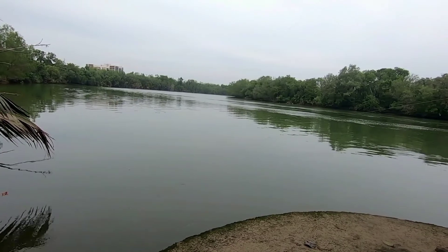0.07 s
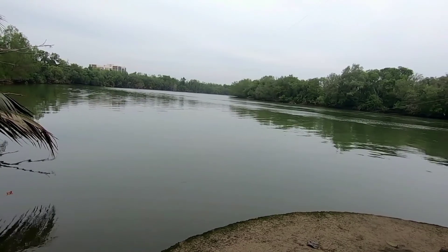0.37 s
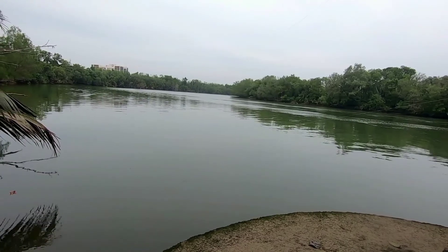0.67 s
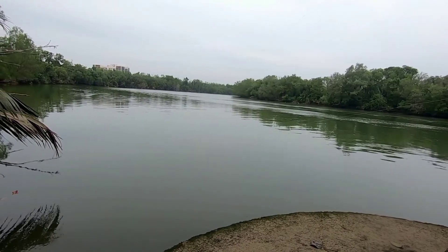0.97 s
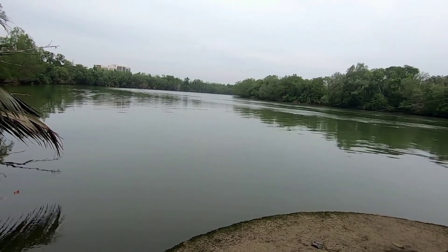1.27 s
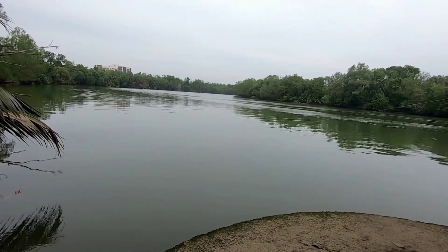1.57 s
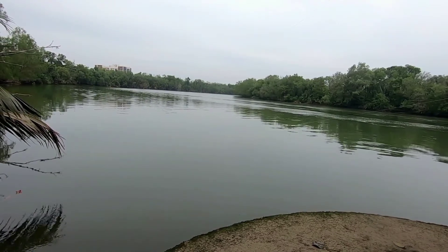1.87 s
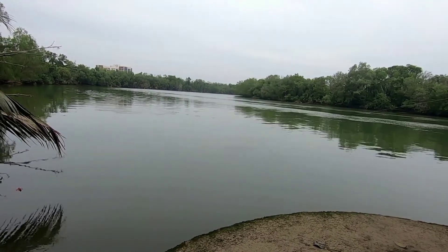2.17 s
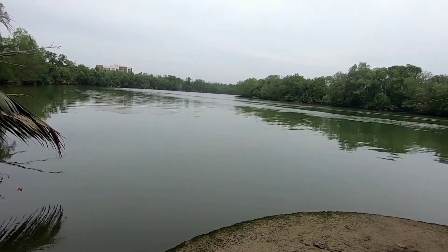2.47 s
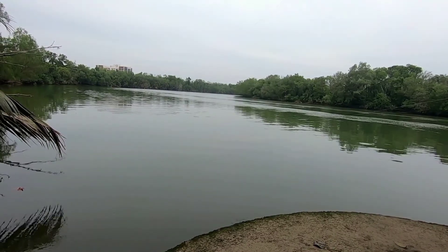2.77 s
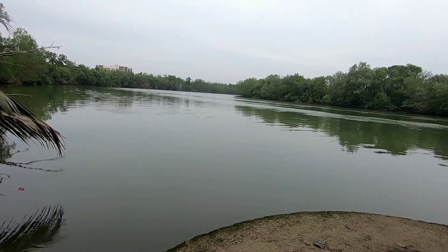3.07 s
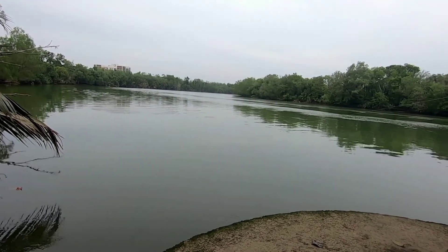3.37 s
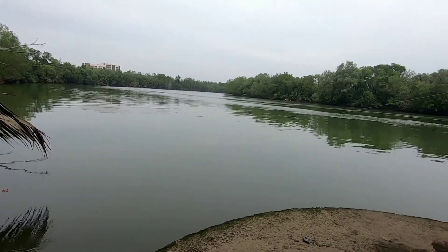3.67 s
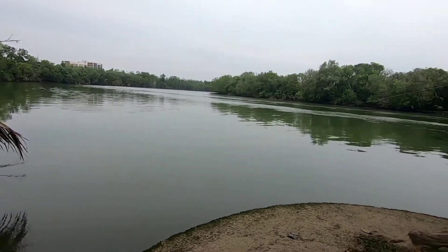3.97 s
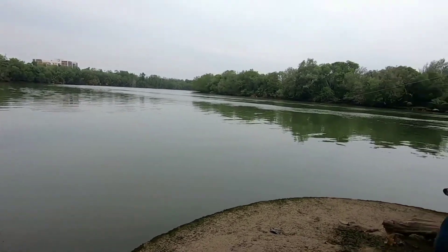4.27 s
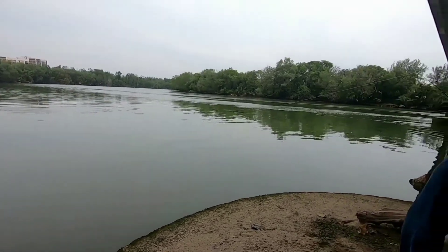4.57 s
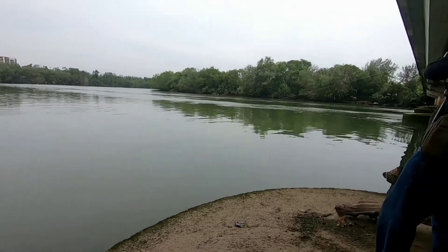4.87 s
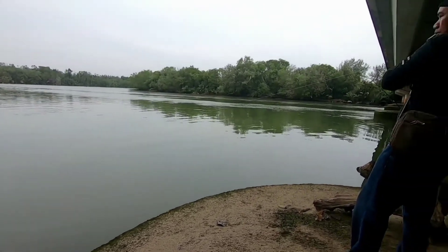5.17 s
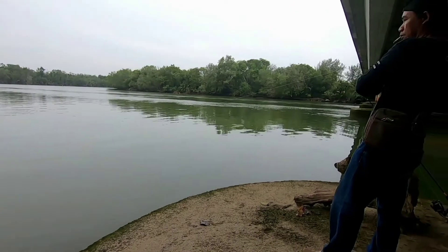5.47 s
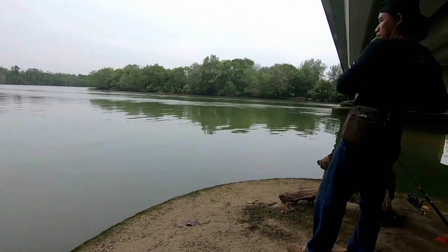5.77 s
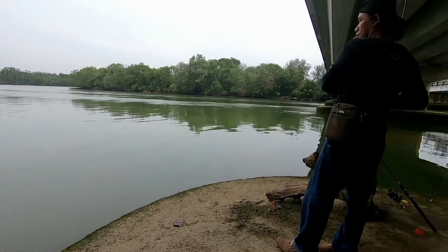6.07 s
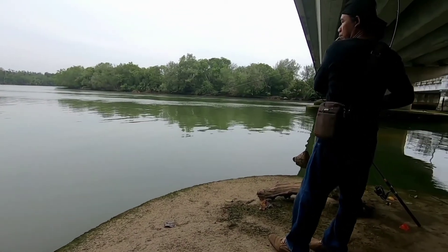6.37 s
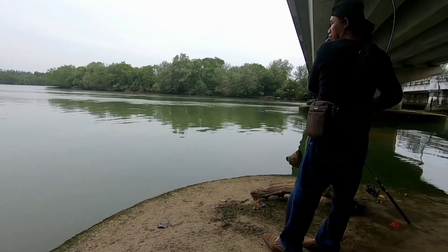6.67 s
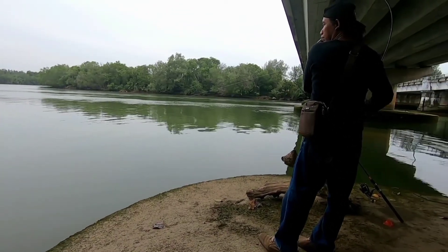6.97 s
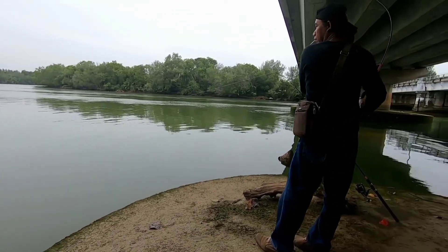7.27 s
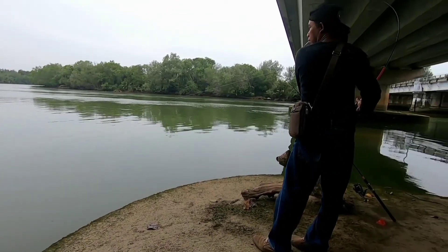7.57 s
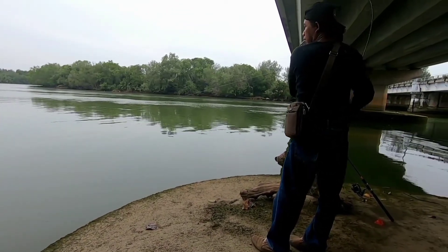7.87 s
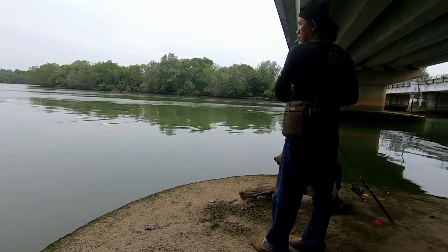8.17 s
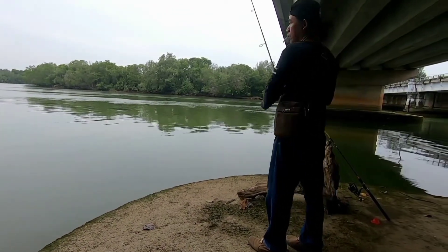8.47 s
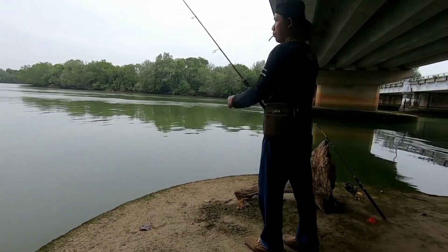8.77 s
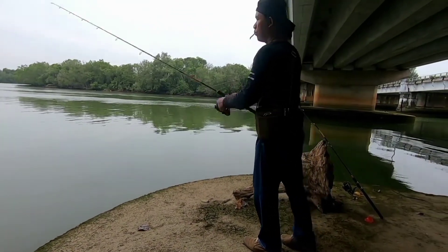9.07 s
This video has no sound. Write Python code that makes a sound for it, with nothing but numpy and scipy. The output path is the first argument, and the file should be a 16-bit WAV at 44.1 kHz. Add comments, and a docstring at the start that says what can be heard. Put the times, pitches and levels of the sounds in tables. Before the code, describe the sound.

Cicadas buzz steadily by a river under a road bridge, over rumbling traffic, humming engines, light wind and a few microphone bumps.

```python
"""A river bank under a road bridge. From the start cicadas buckle their tymbals in the trees, traffic rushes
overhead, wind buffets the microphone and two engines pass, one after the other. From about 2 s come small
plops, ticks and rustles; near 3 s fingers begin to bump and rub the camera, and a bird gives a falling
whistle, faintly again near 6 s. Then a farther engine draws near, and at the very end one insect starts
up on a clear pitch."""
import sys
import numpy as np
from scipy import signal
from scipy.fft import rfft, irfft
from scipy.io import wavfile
from scipy.ndimage import uniform_filter1d

SR = 44100
rng = np.random.default_rng(int(sys.argv[2]) if len(sys.argv) > 2 else 0)


def digitize_waveform(pressure):
    """Quantize a signal to 16-bit integers and store it at the path in sys.argv[1].

    Rows of a 2-D input are taken as channels; values are limited to [-1, 1].
    """
    field = np.atleast_2d(pressure).T
    bounded = np.clip(field, -1, 1)
    quanta = np.round(bounded * 32767).astype(np.int16)
    wavfile.write(sys.argv[1], SR, quanta)


N = 407043
T = np.arange(N) / SR


def from_db(db):
    """Amplitude grows tenfold for every 20 dB."""
    return 10 ** (np.asarray(db) / 20)


def rms_one(x):
    """Normalisation to unit power."""
    return x / np.sqrt(np.mean(np.abs(x) ** 2) + 1e-20)


def in_time(rows):
    """Linear interpolation of each column of a curve at every sample."""
    times, *columns = np.transpose(rows)
    return [np.interp(T, times, column) for column in columns]


def at_hz(points, hz, axis=1):
    """Interpolation of a spectrum on a log-frequency axis."""
    points = np.array(points, float)
    return np.interp(np.log(hz + 1e-3), np.log(points[:, 0]), points[:, axis])


def drift(rate_hz):
    """Low-pass filtered noise: a slow random fluctuation of unit rms."""
    pole = np.exp(-80 * np.pi * rate_hz / SR)
    slow = signal.lfilter([1], [1, -2 * pole, pole * pole], rng.standard_normal(N // 40 + 2002))[2000:]
    return np.interp(np.arange(N) / 40, np.arange(len(slow)), rms_one(slow))


def fade(start, end, ramp_s):
    """A trapezoidal envelope, its ramps centred on start and end."""
    return np.clip((T - start) / ramp_s + .5, 0, 1) * np.clip((end - T) / ramp_s + .5, 0, 1)


def swells(rows):
    """Incoherent sounds add in power: the summed power of Gaussian swells."""
    return sum(from_db(db) ** 2 * np.exp(-(2 * (T - crest) / length) ** 2) for crest, length, db in rows)


def trees(x, t60, direct):
    """Scattering by leaves and trunks adds a dense decaying tail, different at each ear."""
    tails = rng.standard_normal((2, SR)) * from_db(-60 * T[:SR] / t60)
    tails /= np.sqrt(np.sum(tails ** 2, axis=1, keepdims=True))
    scattered = signal.fftconvolve(x[None], tails, axes=1)[:, :N]
    return np.sqrt(direct) * x + np.sqrt(1 - direct) * scattered


# Width of the noise field. Each row: frequency in Hz, side minus mid in dB, left minus right in dB.
STEREO_FIELD = [(30, -28, -2), (80, -18, -0.5), (140, -9, 0), (214, -3.5, -2.5), (308, -1.5, 6),
                (573, -4, 1), (950, 2, -4), (1330, -1, -5.5), (2400, -2, -1.5), (4000, -4.5, -2),
                (6000, -3, 1), (12000, 3.5, -0.5)]
def air_noise(spectrum, flutter_db=None):
    """Coloured noise, partly coherent between the ears; its mid has unit rms before any flutter."""
    hz = np.arange(N // 2 + 1) * SR / N
    low_hz, high_hz = spectrum[0][0] / 1.2, spectrum[-1][0] * 1.2
    band = 1 / (1 + (hz / high_hz) ** 12) / (1 + (low_hz / (hz + 1)) ** 12)
    mid, side = rfft(rng.standard_normal((2, N)))
    width, sides = from_db(at_hz(STEREO_FIELD, hz)), np.array([[1], [-1]])
    pair = (mid + sides * width * side) * from_db(sides * at_hz(STEREO_FIELD, hz, axis=2) / 2)
    x = irfft(pair * band * from_db(at_hz(spectrum, hz)), N)
    x /= np.std(x.mean(0))
    return x if flutter_db is None else x * from_db(flutter_db * drift(22))


def self_noise(level_db=-86.5):
    """The noise floor of the microphone is a faint steady hiss."""
    return from_db(level_db) * air_noise([(7000, -.5), (10500, -3.5), (12000, 2.5), (15000, -3.5)])


# Wind spectrum. Each row: frequency in Hz, relative density in dB.
WIND_SPECTRUM = [(16, -15), (26, -14), (37, -3.5), (46, 1.5), (58, -6.5), (72, -7)]
# Breeze between the gusts. Each row: time in seconds, level in dB.
BREEZE = [(0, -20.5), (1.7, -28), (5.9, -25.5), (6.6, -34), (9.23, -34.5)]
# Each row: crest time in seconds, length in seconds, level in dB.
GUSTS = [(0.124, 0.12, -26), (2.4, 0.21, -20), (2.7, 0.15, -21.5), (3.11, 0.26, -20.5), (4.3, 0.16, -16.5),
         (4.58, 0.11, -16), (5.63, 0.16, -19.5), (5.8, 0.076, -14.5), (6.97, 0.065, -27), (8.11, 0.18, -20),
         (8.38, 0.33, -25.5)]
def wind():
    """Turbulent pressure of breeze and gusts buffets both microphone ports nearly alike."""
    power = from_db(in_time(BREEZE)[0]) ** 2 + swells(GUSTS)
    return np.sqrt(power) * air_noise(WIND_SPECTRUM, flutter_db=1.5)


# Each row: start in seconds, push level in dB, push frequency in Hz, shake level in dB.
BUMPS = [(2.979, -34, 136, -14), (3.055, -24, 131, -16), (3.149, -24, 130, -18), (3.174, -7.5, 126, -8),
         (4.67, -16, 80, -38), (5.262, -11.5, 68, -32), (8.083, -24.5, 124, -23), (8.3031, -7.5, 126, -8.5)]
# Each row: frequency in Hz, gain in dB, time to fall 60 dB in seconds, share in phase at both ports.
HOUSING_MODES = [(131, -0.5, 0.13, 0.2), (188.5, 4, 0.09, 0.22), (270, 2.5, 0.047, 0.07),
                 (485, -1.5, 0.023, 0.15), (637, -1.5, 0.025, 0.02)]
def bumps(cycles=.96, lag_s=.0023):
    """An impact pushes both ports alike and excites the housing's modes; returns (in phase, opposed)."""
    push, shake = np.zeros((2, N))
    t = T[:SR // 4]
    late = np.maximum(t - lag_s, 0)
    for start, push_db, hz, shake_db in BUMPS:
        span = slice(int(start * SR), int(start * SR) + len(t))
        envelope = from_db(push_db) * np.exp(-(late * hz / cycles) ** 4)
        push[span] += envelope * np.sin(2 * np.pi * hz * late)
        for k, (mode_hz, db, t60, in_phase) in enumerate(HOUSING_MODES):
            ring = (-1) ** k * from_db(shake_db + db - 60 * t / t60) * np.sin(2 * np.pi * mode_hz * t)
            shake[span] += ring
            push[span] += in_phase * ring
    fingertip = signal.butter(4, 900, fs=SR, output="sos")   # a soft contact excites nothing high
    return signal.sosfilt(fingertip, np.array([push, shake]) + 1e-18)


# Fingers shifting on the camera. Each row: start in seconds, end in seconds, level in dB.
RUBS = [(2.956, 3.43, -36), (3.697, 4.46, -32.5), (4.45, 5.25, -43), (5.248, 5.803, -42),
        (5.84, 6.505, -45)]
# Each row: frequency in Hz, relative density in dB.
RUB_SPECTRUM = [(50, -6), (200, 0.5), (340, -4.5), (420, -11.5), (600, -1.5), (740, -8), (930, -17),
                (1100, -19), (1400, -29.5), (2200, -37.5)]
def handling():
    """Structure-borne sound: shaking and friction move the two ports in opposition, a push in phase."""
    push, shake = bumps()
    pressure = sum(from_db(db) * fade(start, end, ramp_s=.1) for start, end, db in RUBS)
    rub = pressure * rms_one(air_noise(RUB_SPECTRUM, flutter_db=5.5)[0])
    return push + (shake + rub) * [[-1], [1]]


# Each row: crest time in seconds, length in seconds, level in dB.
RUSTLES = [(2.17, 0.071, -47), (4.27, 0.11, -52), (4.44, 0.11, -56), (4.61, 0.092, -53), (8.16, 0.2, -50.5)]
# Each row: frequency in Hz, relative density in dB.
RUSTLE_SPECTRUM = [(800, -4.5), (1400, 5), (2000, -5), (3000, -3.5), (4500, -11), (7000, -15.5)]
def rustle():
    """Friction of cloth or grit close by: fast amplitude modulation clumps noise into grains."""
    grains = rms_one(air_noise(RUSTLE_SPECTRUM) * from_db(3.5 * drift(110)))
    return np.sqrt(swells(RUSTLES)) * grains


# Each row: start in seconds, source peak in dB, centre in Hz, width in octaves, decay in seconds.
TICKS = [(1.3443, -23, 4800, 1.2, 0.001), (2.154, -38, 2500, 1.2, 0.0017), (2.3186, -34, 2400, 1.5, .012),
         (2.3345, -29.5, 2300, 1.6, 0.0035), (2.445, -38, 2540, 0.8, 0.0026),
         (4.1208, -42, 3200, 0.6, .002), (4.153, -38, 2800, 1.3, 0.0014), (4.2328, -37, 2600, 1.3, 0.0015),
         (4.2404, -36, 2600, 1.3, .0012), (4.2495, -37, 2500, 1.5, .005), (4.255, -40, 1000, 0.64, 0.029),
         (4.294, -38, 3100, 1.2, 0.0013), (4.4278, -37, 2700, 1.0, .0015), (4.432, -39, 2450, 0.5, 0.016),
         (4.466, -37, 1290, 0.29, 0.022), (5.3064, -40, 2750, .45, .001),
         (5.3148, -30.5, 2700, 0.55, 0.0006), (7.601, -47, 4300, 0.89, 0.059),
         (7.879, -39, 1280, 0.3, 0.13), (8.112, -33, 2200, 1.3, 0.0025), (8.223, -37, 2200, 1.4, 0.0054),
         (8.835, -32, 1730, 0.24, 0.0029)]
def ticks(grain_db=4, crack=4, right_lead_db=3.5):
    """Tiny snaps are band-limited transients: an impulsive crack, then decaying, crumbling grains."""
    out, t = np.zeros(N), T[:SR // 4]
    for start, db, hz, octaves, decay_s in TICKS:
        edges_hz = hz * 2 ** (np.array([-.5, .5]) * octaves)
        grains = rng.standard_normal(len(t)) * from_db(grain_db * drift(280)[:len(t)])
        burst = grains * np.exp(-t / decay_s) * (1 - np.exp(-2 * t / decay_s))
        burst[0] += crack
        snap = signal.sosfilt(signal.butter(3, edges_hz, "band", fs=SR, output="sos"), burst)
        onset = int(start * SR)
        out[onset:onset + len(t)] += from_db(db) * snap / np.abs(snap).max()
    soft = signal.sosfilt(signal.butter(4, 7500, fs=SR, output="sos"), out + 1e-18)
    return trees(soft, t60=.09, direct=.85) * from_db(np.array([[-.5], [.5]]) * right_lead_db)


# Plops, likely at the water's edge. Each row: start in seconds, source level in dB, first pitch in Hz.
PLOPS = [(2.075, -22, 714), (3.017, -26, 1000), (3.051, -25.5, 1020)]
def plops(t60=.047, attack_s=.00083, chirp=.76):
    """A bubble is a damped resonator that rings briefly and rises in pitch."""
    out = np.zeros(N)
    for start, db, hz in PLOPS:
        t = np.maximum(T - start, 0)
        envelope = from_db(db - 60 * np.minimum(t / t60, 3)) * (1 - np.exp(-t / attack_s))
        out += envelope * np.sin(2 * np.pi * hz * t * (1 + chirp * t))
    return trees(out, t60=.25, direct=.6)


# Each row: start and length in seconds, first and last pitch in Hz, level in dB, direct share of power.
WHISTLES = [(2.791, 0.048, 4000, 3200, -51.5, 0.2), (3.365, 0.195, 4650, 3225, -34.5, 0.1),
            (5.762, .024, 4450, 4270, -59, .2), (5.803, .036, 4300, 3300, -55, .1)]
def bird(glide_s=.0082, settle_s=.045, quaver=.012, flutter_db=2, fade_db_per_s=36):
    """Frequency modulation: a whistle drops fast, settles with a quaver and lingers among the trees."""
    out = np.zeros((2, N))
    for start, length, first_hz, last_hz, db, direct in WHISTLES:
        t = np.maximum(T - start, 0)
        glide = .7 * np.exp(-t / glide_s) + .3 * np.exp(-t / settle_s)
        hz = last_hz + (first_hz - last_hz) * glide
        phase = 2 * np.pi * np.cumsum(hz * (1 + quaver * drift(120))) / SR
        level = from_db(db - fade_db_per_s * t + flutter_db * drift(36))
        whistle = level * fade(start + .001, start + length, .008) * np.sin(phase)
        out += trees(whistle, t60=1.1, direct=direct)
    return out


# Each row: crest time in seconds, length in seconds, centre in Hz, level in dB.
TYRE_DRONES = [(3.877, 0.28, 299, -46), (5.432, .32, 205, -37.5)]
def tyre_drones(half_width_octaves=.26, skirt_db=-18):
    """Narrow-band noise has a pitch: tyres drone briefly on the deck."""
    spread, out = 2 ** half_width_octaves, np.zeros((2, N))
    for crest, length, hz, db in TYRE_DRONES:
        band = air_noise([(hz / spread, skirt_db), (hz, 0), (hz * spread, skirt_db)])
        out += np.sqrt(swells([(crest, length, db)])) * band
    return out


# Each row: time in seconds, then the levels of road roar, tyre rush and hiss in dB.
TRAFFIC_LEVELS = [(0, -42, -40.5, -53.5), (1, -40, -43.5, -54), (2.1, -41, -41.5, -55),
                  (2.5, -41, -46.5, -56), (3.1, -43, -46, -59), (3.45, -47.5, -49, -61),
                  (4.35, -43.5, -48.5, -59.5), (5.1, -51, -49.5, -62.5), (5.55, -44.5, -49, -60.5),
                  (6.1, -51, -50.5, -61), (8.2, -49.5, -46.5, -60), (9.23, -51, -45.5, -57)]
# Heavy vehicles shake the deck. Each row: crest time in seconds, length in seconds, level in dB.
DECK_SURGES = [(2.35, 0.38, -32), (3.08, 0.4, -23), (5.4, 0.13, -26), (5.75, 0.68, -30), (6.4, 0.16, -36)]
# Spectra of the four noises. Each row: frequency in Hz, relative density in dB.
DECK_SPECTRUM = [(55, -19.5), (80, 5.5), (120, 3), (160, -4.5), (210, -10), (270, -22), (400, -34)]
ROAR_SPECTRUM = [(150, -3.5), (230, -1.5), (320, -0.5), (500, 3.5), (750, 1), (950, -4.5), (1300, -24)]
TYRE_SPECTRUM = [(600, -9.5), (850, 0), (1050, 1), (1400, -2.5), (1800, -7), (2300, -15), (3200, -33)]
HISS_SPECTRUM = [(1600, -13), (2300, 8.5), (3000, 6), (4000, 1.5), (5000, 0), (7000, -18.5), (9500, -43.5)]
def traffic(deck_db=-31.5, deck_follows=.69):
    """Forced vibration: the deck rumbles with the road roar, under tyre rush and a thin hiss."""
    roar_db, tyre_db, hiss_db = in_time(TRAFFIC_LEVELS)
    deck_level = from_db(deck_db + deck_follows * (roar_db - roar_db.mean()))
    deck = np.sqrt(deck_level ** 2 + swells(DECK_SURGES)) * air_noise(DECK_SPECTRUM, flutter_db=2)
    roar = from_db(roar_db) * air_noise(ROAR_SPECTRUM)
    tyres = from_db(tyre_db) * air_noise(TYRE_SPECTRUM, flutter_db=1.23)
    return deck + roar + tyres + from_db(hiss_db) * air_noise(HISS_SPECTRUM)


# Each row: time in seconds, level in dB.
FAR_ENGINE_LEVELS = [(5.8, -32), (8.6, -32.5), (9.2, -23)]
def far_engine(firing_hz=81.7):
    """A steady firing rate gives one low tone, which grows louder as the engine draws near."""
    level = from_db(in_time(FAR_ENGINE_LEVELS)[0] + 1.7 * drift(3.8))
    return level * np.sin(2 * np.pi * firing_hz * T + .5 * drift(2.8)) * fade(6.36, 11, .21)


def exhaust(firing, levels, pull_s, rasp_db):
    """Periodic firing makes harmonic orders; echoes under the deck make each waver."""
    first_db, second_db = in_time(levels)
    phase = 2 * np.pi * np.cumsum(in_time(firing)[0] * (1 + .0016 * drift(9))) / SR
    note = sum(from_db(db + 1.05 * drift(8)) * np.sin(order * phase + .12 * drift(6))
               for order, db in ((1, first_db), (2, second_db)))
    # weaker, higher orders sound while the engine pulls hard
    rasp = sum(from_db(db + 3 * drift(7)) * np.sin(order * phase + .45 * drift(7))
               for order, db in rasp_db.items())
    return note * fade(-1, levels[-1][0], .067) + rasp * fade(*pull_s, .7)


# Engine speeds. Each row: time in seconds, firing rate in Hz.
LEADER_FIRING = [(0, 95), (.35, 97), (.6, 95.5), (.9, 90.6), (1.3, 89.8), (2.3, 89.8)]
FOLLOWER_FIRING = [(.6, 85), (1.7, 82.5), (2.05, 80.5), (2.22, 78.4), (2.46, 76.6), (3.2, 76.2),
                   (3.4, 75.2), (3.7, 75), (4.53, 73.5), (5.4, 72.8)]
# Exhaust notes. Each row: time in seconds, levels of the first and second orders in dB.
LEADER_LEVELS = [(0, -28, -40), (.08, -10.5, -35), (.16, -19, -36), (.29, -34, -41.5), (.43, -17, -37),
                 (.56, -17, -36), (.67, -33, -40), (.79, -15.5, -35), (.89, -20, -40), (.96, -25, -43.5),
                 (1.2, -25.5, -32), (1.42, -17, -29), (1.63, -21.5, -30.5), (1.85, -21, -25.5),
                 (2.2, -44, -27), (2.3, -42, -57)]
FOLLOWER_LEVELS = [(.55, -49, -58), (.75, -18.5, -36), (1.3, -44, -45), (1.72, -35, -41), (2.02, -28, -43),
                   (2.22, -18.5, -18.5), (2.33, -25, -32.5), (2.47, -19, -18), (2.639, -17.5, -33.5),
                   (2.76, -17.5, -25.5), (2.88, -19, -35.5), (3.1, -30, -21), (3.35, -36.5, -35.5),
                   (3.6, -21.5, -32), (3.9, -25, -31), (4.45, -26, -25), (4.9, -35, -29), (5.151, -29, -41),
                   (5.601, -36, -55)]
def engines():
    """Superposition: the notes of two passing vehicles beat where they overlap; a third comes later."""
    leader = exhaust(LEADER_FIRING, LEADER_LEVELS, pull_s=(1, 2.12),
                     rasp_db={3: -48, 4: -39.5, 5: -49.5, 6: -50.5})
    follower = exhaust(FOLLOWER_FIRING, FOLLOWER_LEVELS, pull_s=(2.12, 3.35), rasp_db={3: -44, 4: -52})
    return np.sqrt(2) * (leader + follower + far_engine()) * from_db([[-.4], [.4]])


def shrill_insect(start_s=8.99, hz=5749, level_db=-40.3):
    """A nearly pure tone stands out from noise: one insect starts up amid the chorus."""
    tone = np.sin(2 * np.pi * np.cumsum(hz * (1 + .0011 * drift(40))) / SR)
    return trees(from_db(level_db) * fade(start_s, 11, ramp_s=.2) * tone, t60=.29, direct=.85)


# Each row: frequency in Hz, gain in dB.
ABDOMEN_RESONANCE = [(4800, -39), (5100, -23.5), (5400, -7), (5700, 5), (6000, 3.5), (6300, -2.5),
                     (6620, -7.5), (6900, -30.5), (7250, -28), (7700, -39)]
def cicada(beat_hz, odd_weight, jitter, body_size=1, flicker_db=1.5, scatter_rad=.68):
    """Source and filter: two tymbals buckle in turn, and the abdomen passes the harmonics near 6 kHz."""
    phase = 2 * np.pi * np.cumsum(beat_hz * (1 + jitter * drift(24.9) + .0006 * drift(1.488))) / SR
    out = np.zeros(N)
    for k in range(17, 25):
        resonance = from_db(at_hz(ABDOMEN_RESONANCE, k * np.mean(beat_hz) * body_size))
        strength = resonance * (odd_weight if k % 2 else 1)   # equal tymbals would cancel odd harmonics
        # stirring leaves make each harmonic flicker in level and phase
        flicker = from_db(flicker_db * drift(12))
        out += strength * flicker * np.cos(k * phase + scatter_rad * drift(14) + rng.uniform(0, 2 * np.pi))
    return out


# Each row: time in seconds, beat rate of each tymbal in Hz, relative level in dB, odd-harmonic weight.
NEAREST_CICADA = [(0, 301.8, -9, .4), (2.05, 302.4, -6.5, .3), (2.3, 304.5, -7.5, .6), (4, 300, -9.5, 1.1),
                  (5, 299, -8, 1.4), (6.9, 301, -7, 1.4), (7.5, 299.6, -7, 1.2), (8.1, 298.9, -6, 1.2),
                  (9.23, 299.2, -10, .6)]
# Each row: start and end in seconds, beat rate in Hz, relative level in dB, odd-harmonic weight,
# body size relative to the nearest cicada.
OTHER_CICADAS = [(2.2, 7.6, 291.2, -6.5, .5, 1), (4.4, 7.7, 295, -5, .3, 1), (6.3, 8.3, 306.3, -11, .2, 1),
                 (2.1, 4.3, 296.7, -8, 1, 1), (-.5, 2.2, 275.6, -6, .8, 1), (-.5, .9, 281.8, -10, .2, 1.03),
                 (.7, 2.0, 302.4, -12.5, .15, 1.07), (7.7, 8.3, 316.2, -10, .2, 1.1),
                 (8.1, 9.8, 286.6, -8, .3, 1)]
# Far cicadas merged into one hiss. Each row: frequency in Hz, relative density in dB.
FAR_CHORUS_SPECTRUM = [(4500, -51.5), (5000, -26), (5300, -7), (5560, -8), (5850, 2), (6050, 4.5),
                       (6200, -10.5), (6580, -8), (6780, -19), (7200, -19.5), (7800, -36), (9300, -38.5),
                       (10500, -61.5)]
# The whole chorus. Each row: time in seconds, level in dB.
CHORUS_LEVELS = [(0, -42.5), (1.95, -41.5), (2.3, -38.5), (3.35, -42), (5.3, -41.5), (7, -39.5),
                 (8.2, -41.5), (8.55, -44.5), (9.23, -42.5)]
def chorus(far_relative_db=-2.3, swell_db=.83, swell_hz=2.8):
    """Incoherent summation: far cicadas merge into a hiss, from which a few near ones stand out."""
    beat_hz, db, odd_weight = in_time(NEAREST_CICADA)
    singers = from_db(db) * cicada(beat_hz, odd_weight, jitter=.0022)
    for start, end, beat_hz, db, odd_weight, size in OTHER_CICADAS:
        song = cicada(beat_hz, odd_weight, jitter=.0013, body_size=size)
        singers += from_db(db) * fade(start, end, .8) * song
    voices = trees(singers, t60=.28, direct=.46)
    voices += from_db(far_relative_db) * air_noise(FAR_CHORUS_SPECTRUM)
    voices /= np.sqrt(uniform_filter1d(voices.mean(0) ** 2, SR // 6))   # even out the summed level
    return voices * from_db(in_time(CHORUS_LEVELS)[0] + swell_db * drift(swell_hz))


def scene():
    """Linear superposition of everything heard from the bank."""
    outdoors = chorus() + shrill_insect() + engines() + traffic() + tyre_drones() + bird()
    close_by = ticks() + rustle() + plops()
    return outdoors + close_by + wind() + handling() + self_noise()


def record(dry, ceiling=.98, stopband_hz=16600):
    """A brief fade-in avoids a click, saturation rounds the hardest bumps and a low-pass cuts the top."""
    rounded = np.minimum(T / .004, 1) * dry / (1 + (dry / ceiling) ** 8) ** (1 / 8)
    return signal.sosfilt(signal.cheby2(12, 70, stopband_hz, fs=SR, output="sos"), rounded)


dry = scene()
out = record(dry)
digitize_waveform(out)
```